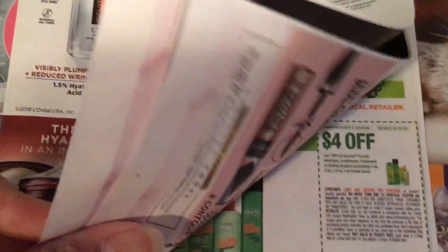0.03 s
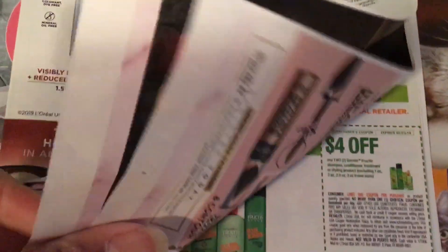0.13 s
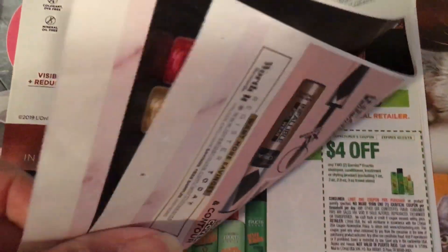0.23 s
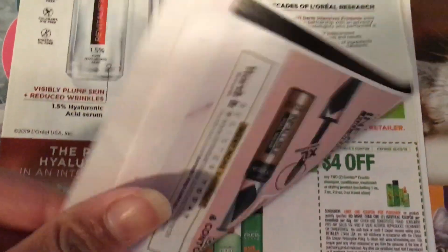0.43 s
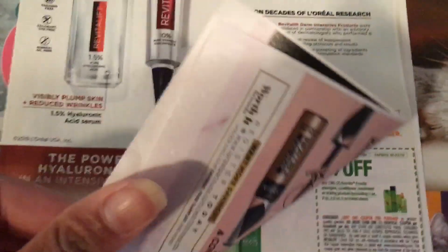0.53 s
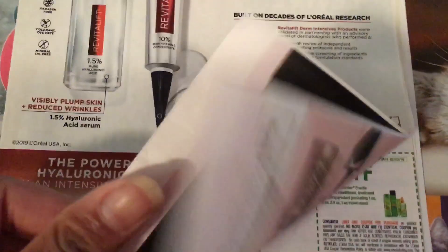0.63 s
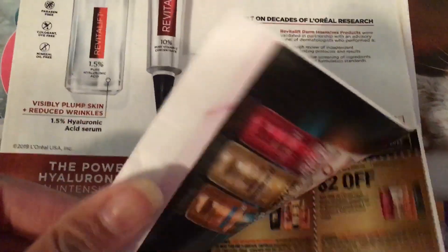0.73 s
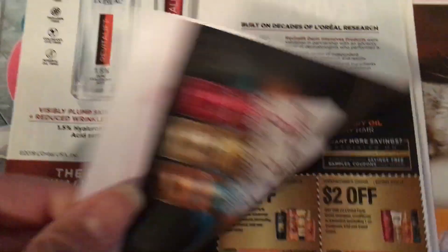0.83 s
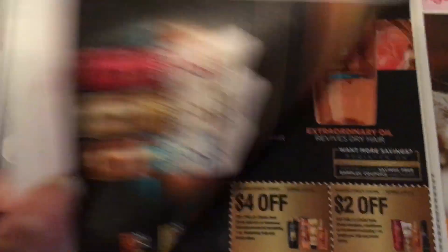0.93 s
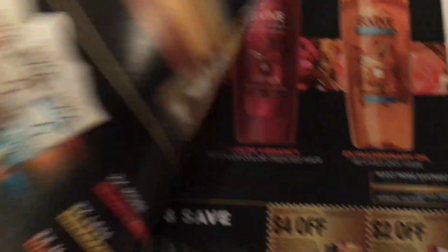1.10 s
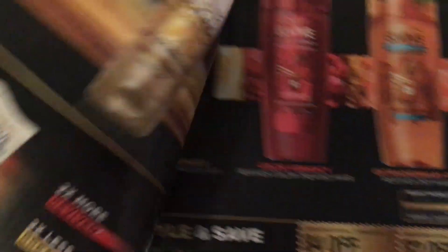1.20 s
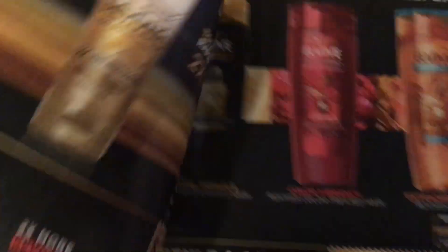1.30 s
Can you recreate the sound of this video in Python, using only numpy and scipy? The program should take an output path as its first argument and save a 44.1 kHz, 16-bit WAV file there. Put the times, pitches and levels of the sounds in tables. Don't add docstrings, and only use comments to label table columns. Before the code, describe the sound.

Glossy paper pages crinkle, slide and snap as they are turned close up in a quiet room.

```python
import sys
import numpy as np
from scipy import signal
from scipy.fft import rfft, irfft
from scipy.io import wavfile
from scipy.ndimage import uniform_filter1d

SR = 44100
rng = np.random.default_rng(int(sys.argv[2]) if len(sys.argv) > 2 else 0)


def unload_wav(signal):
    wavfile.write(
        sys.argv[1],
        SR,
        np.round(np.clip(np.atleast_2d(signal).T, -1, 1) * 32767).astype(np.int16),
    )


def voltage_ratio(level):
    return 10 ** (np.asarray(level, float) / 20)


N = 59535

# pitch_hz [Hz], level_db [dB per Hz]
ROOM_COLOUR = [(15, -41), (25, 9), (399, -3.5), (634, -9), (1120, -7.5), (1360, -20), (1510, -10.5),
               (12900, -21.5), (16500, -36)]
# pitch_hz [Hz], level_db [dB per Hz]
SLIDE_COLOUR = [(88, -37), (150, -13), (539, -6.5), (1560, 6), (4510, 0.5), (4870, -2), (9150, -1.5),
                (15300, -5), (16500, -51)]
# start_s [s], level_db [dB], tilt_db [dB per octave], pocket_hz [Hz]
LIFT_STROKES = [
    [(0.0, -42, 1.2, 6640), (0.034, -48, 0.8, 6700), (0.08, -53.5, -0.8, 5660), (0.138, -43.5, -0.3, 6720),
     (0.176, -55.5, 0, 5990), (0.214, -38, -0.5, 6160)],
    [(0.245, -45, 0, 4870), (0.272, -44, -4, 4500), (0.284, -40, -1.2, 4600), (0.357, -46, -1.2, 4920),
     (0.387, -49, -0.2, 6300), (0.426, -38.5, 1.8, 6750)],
    [(0.455, -39.5, -0.9, 8600), (0.513, -46.5, 1.2, 8800), (0.545, -46, 0.6, 8850),
     (0.552, -45, 0.7, 4500), (0.575, -43, 1.3, 4590), (0.587, -39, -0.8, 4510), (0.604, -52.5, -3, 4350)],
    [(0.618, -54.5, -5, 5330), (0.64, -56.5, -1.5, 6200), (0.68, -44, -1, 6400)],
    [(0.715, -39.5, -1.5, 6200), (0.768, -56.5, -2.8, 5250)],
]
# start_s [s], level_db [dB], tilt_db [dB per octave], pocket_hz [Hz]
SWEEP_STROKES = [
    [(0.782, -69, -10, 7590), (0.808, -75, -2, 7600), (0.818, -40, 1, 7600), (0.826, -38, 3, 7360),
     (0.858, -40, 1, 7500)],
    [(0.872, -41, 1.5, 7360), (0.93, -42.5, 1, 8200), (0.966, -45.5, 2, 7060)],
    [(1.0, -45.5, -0.3, 5400), (1.058, -47.5, 1, 5660), (1.104, -59.5, -0.5, 6100), (1.136, -58, 1.5, 7700),
     (1.148, -58, -0.5, 7700), (1.17, -60, 2.5, 7480)],
    [(1.18, -59, -4, 6440), (1.184, -65, 1.5, 6400), (1.248, -62, 0.01, 5770), (1.254, -57, -8, 5760),
     (1.272, -66, -7, 5760)],
    [(1.29, -55.5, -8, 5500), (1.294, -63, -5, 5530), (1.326, -57, 0, 5730), (1.33, -53.5, 0, 5560),
     (1.35, -57.5, 2.5, 5730)],
]
# pitch_ratio [1], depth_db [dB]
POCKET_DIPS = [(.64, -2.5), (1.5, -1.5)]
# start_s [s], level_db [dB], travel_ms [ms at 1 kHz], lowest_hz [Hz]
AIR_FLAPS = [(.003, -50, 3.8, 141), (.220, -35.5, 2.26, 128), (0.223, -59, 4.5, 59),
             (0.278, -38.5, 1.47, 174), (0.371, -52, 2.9, 122), (0.431, -47, 3.45, 120),
             (0.582, -53.5, 2.18, 150), (0.694, -45.5, 1.77, 110), (0.894, -54, 2.87, 140),
             (0.971, -35, 3.18, 175), (.975, -42, 5.26, 62.4), (1.237, -50.5, 2.4, 139),
             (1.279, -48, 1.37, 302)]
# start_s [s], level_db [dB peak], pitch_hz [Hz], length_ms [ms]
DULL_TICKS = [(0.048, -38, 1410, 1.04), (0.281, -25.5, 1700, 1.7), (.4425, -32, 2400, 2.2),
              (.583, -35.5, 1780, 2.03), (0.609, -31, 2560, 0.94), (0.669, -39, 1900, 1.1),
              (.4598, -31, 2300, 1.6), (.6895, -21, 3970, 1.18), (0.743, -37.5, 2190, 2.2),
              (.772, -37.5, 1580, 1.13), (.831, -28, 8000, 2.4), (0.8627, -24, 2600, 1.52),
              (.900, -37.5, 910, 1.93), (.951, -37, 1410, 0.65), (0.971, -26, 1970, 1.2),
              (1.049, -41.5, 1170, 2.15), (1.174, -42.5, 1010, 1.1), (1.277, -37.5, 606, 2.55),
              (1.278, -36.5, 2450, 2.6)]
# start_s [s], level_db [dB peak], lowest_hz [Hz], length_ms [ms], travel_ms [ms at 1 kHz]
CREASE_SNAPS = [
    (0.2203, -9, 250, 1.15, 3),
    (0.4314, -17.5, 550, 1.3, 2.93),
    (0.6865, -17, 990, 1.094, 3.15),
    (0.695, -16.5, 590, 1.9, 3.0),
    (0.9723, -10, 250, 1.04, 2.9),
]
# pitch_hz [Hz], level_db [dB per Hz]
SNAP_COLOUR = [(240, -15), (400, -8.5), (3120, -2), (7700, -6), (11200, -10), (15000, -10), (16500, -27)]
PANEL_BUCKLES = [.220, .281, .431, .686, .695, .772, .863, .972, 1.278]
# delay_ms [ms], level_db [dB peak], pitch_hz [Hz], swell_ms [ms]
PANEL_RINGS = [
    [(.7, -16.5, 6800, 0.53), (0.897, -14.5, 4250, 0.45), (.55, -20, 11100, 0.51),
     (1.798, -19.5, 2810, 0.52), (1.77, -21.5, 1524, 1.22), (4.5, -30, 1990, 1.07), (2.27, -36, 630, 1.13)],
    [(.4, -31.5, 1700, 0.97), (0.19, -35.5, 3500, 0.52)],
    [(.55, -20.5, 5830, 0.44), (.4, -26.5, 9200, 0.41), (3.8, -22.5, 3050, 0.54), (1.61, -25.5, 1640, 1.4),
     (2.2, -30.5, 860, 1.35), (16.5, -35, 1400, 0.35), (2.67, -32.5, 1280, 1.2), (6.8, -30, 2250, 0.96)],
    [(.8, -21.5, 9760, 0.58), (1.2, -20.5, 6170, 0.61), (2.12, -30.5, 2900, 0.88), (1.164, -29, 4850, 0.64),
     (0.88, -35, 13100, 0.54)],
    [(0.29, -22, 2650, .9), (1.29, -19.5, 3270, 0.63), (1.04, -24, 12000, 0.73), (2.6, -26, 5170, 0.82),
     (0.53, -28, 1960, 1.16), (5.6, -23.5, 2470, 0.34), (1.57, -35, 906, 1.06)],
    [(.3, -45, 780, 1.1), (.6, -43, 2570, 0.91)],
    [(0.23, -27.5, 3270, 0.48), (0.72, -26.5, 1920, 0.63), (0.39, -36, 5530, 0.58)],
    [(1.1, -15, 12000, 0.41), (0.97, -14.5, 6780, 0.39), (0.74, -20, 1410, 1.44), (2.2, -17.5, 2440, 0.57),
     (3.3, -23, 3630, 0.56), (3.16, -33, 758, 1.5)],
    [(.4, -42, 1990, 0.71), (.6, -50, 4630, 0.75)],
]


def unit(x):
    return x / np.sqrt(np.mean(x ** 2))


def colour(points, hz):
    p = np.array(points, float)
    return np.interp(np.log(hz + 1), np.log(p[:, 0]), p[:, 1])


def shaped(x, gain):
    return irfft(rfft(x) * gain(np.fft.rfftfreq(len(x), 1 / SR)), len(x))


def bell(hz, centre_hz, octaves):
    return np.exp(-.5 * (np.log2((hz + 1) / centre_hz) / octaves) ** 2)


def walk(rate_hz):
    hold = int(SR / rate_hz)
    levels = np.repeat(rng.standard_normal(N // hold + 1), hold)
    slewed = uniform_filter1d(uniform_filter1d(levels, hold), hold)
    return unit(slewed[:N])


def add(out, x, start_s):
    i = int(start_s * SR)
    out[i:i + len(x)] += x[:len(out) - i]


def bending(length_ms, travel_ms, level_db, gain, chance, size=4096):
    loss_db_per_cycle, fade = .55, .55
    hz = np.fft.rfftfreq(size, 1 / SR)
    when, far, big = chance[:, :, None]
    late = -np.log(1 - .99 * when)
    wait_cycles = hz * late * length_ms / 1000
    travel_cycles = 2 * (.3 + 1.5 * far) * travel_ms / 1000 * np.sqrt(1000 * hz)
    strength = (2 * big - 1) * np.exp(-fade * late) * voltage_ratio(-loss_db_per_cycle * wait_cycles)
    waves = np.sum(strength * np.exp(-2j * np.pi * (wait_cycles + travel_cycles)), axis=0)
    even = np.sqrt(uniform_filter1d(np.abs(waves) ** 2, size=50))
    fade_out = np.clip(3 - 4 * np.arange(size) / size, 0, 1)
    wave = irfft(gain(hz) * waves / even, size) * fade_out
    return wave * voltage_ratio(level_db) / np.abs(wave).max()


def room_tone():
    hum_hz, hum_width_hz = 59, 11
    air = unit(shaped(rng.standard_normal(N), lambda hz: voltage_ratio(colour(ROOM_COLOUR, hz))))
    hum = unit(shaped(rng.standard_normal(N), lambda hz: 1 / (1 + (2 * (hz - hum_hz) / hum_width_hz) ** 2)))
    return air * voltage_ratio(-57.5) + hum * voltage_ratio(-63.5)


def slide():
    grains_per_s, grain_db = 14000, 2.2
    pocket_db, pocket_oct, dip_oct = 5, 0.28, 0.078
    flicker_db, judder_db = 1.8, 1.1
    rows = np.concatenate([np.array(s, float) for s in LIFT_STROKES + SWEEP_STROKES])
    t = np.arange(N) / SR
    level, tilt, pocket = (np.interp(t, rows[:, 0], rows[:, k]) for k in (1, 2, 3))
    out = 0
    for f in 250 * 2 ** np.arange(0, 6.2, .25):
        slips = (rng.random(N) < grains_per_s / SR) * rng.standard_normal(N)
        grains = slips * voltage_ratio(grain_db * rng.exponential(size=N))
        band = shaped(unit(grains), lambda hz: bell(hz, f, .13) * voltage_ratio(colour(SLIDE_COLOUR, hz)))
        dips = sum(db * bell(f, ratio * pocket, dip_oct) for ratio, db in POCKET_DIPS)
        resonance = pocket_db * bell(f, pocket, pocket_oct)
        brightness = tilt * np.log2(f / 3500)
        out = out + band * voltage_ratio(dips + brightness + resonance + flicker_db * walk(20.63))
    return unit(out) * voltage_ratio(level + judder_db * walk(88.9))


def flaps():
    top_hz, q = 516, 1.46
    out = np.zeros(N)
    one_break = np.array([[0], [.5], [1]])
    for s, db, travel, f in AIR_FLAPS:
        def low(hz):
            return hz ** 1.63 / (f ** 2 - hz ** 2 + 1j * hz * f / q) / (1 + (hz / top_hz) ** 2)
        add(out, bending(0, travel, db, low, one_break, size=8192), s)
    return out


def ticks():
    out = np.zeros(N)
    width_oct, travel_ms = 0.75, 0.96
    for s, db, f, ms in DULL_TICKS:
        add(out, bending(ms, travel_ms, db, lambda hz: bell(hz, f, width_oct) + 0.02, rng.random((3, 30))), s)
    return out


def snaps():
    out = np.zeros(N)
    for s, db, f, ms, travel in CREASE_SNAPS:
        def crack(hz):
            return voltage_ratio(colour(SNAP_COLOUR, hz)) / (1 + (f / (hz + 1)) ** 2)
        add(out, bending(ms, travel, db, crack, rng.random((3, 40))), s)
    return out


def rings():
    out, t = np.zeros(N), np.arange(1000) / SR
    sag = .05
    for s, panels in zip(PANEL_BUCKLES, PANEL_RINGS):
        for delay_ms, db, f, swell_ms in panels:
            u = np.minimum(t * 1000 / swell_ms, 20)
            swell = u * np.exp(1 - u)
            tone = np.sin(2 * np.pi * f * t * (1 + sag * (1 - u / 2)))
            add(out, voltage_ratio(db) * swell * tone, s + delay_ms / 1000)
    return out


def reverberation(pops):
    t60_s, wet_db, ceiling_s, ceiling_db = 0.11, -12, .0146, -20.5
    t = np.arange(SR // 3) / SR
    tail = rng.standard_normal(len(t)) * voltage_ratio(-60 * t / t60_s) * np.minimum(t / 0.002, 1)
    energy = np.sum(tail ** 2)
    tail = voltage_ratio(wet_db) * shaped(tail, lambda hz: 1 / np.sqrt(1 + (hz / 7000) ** 2)) / np.sqrt(energy)
    echo = rng.standard_normal(60) * np.exp(-np.arange(60.))
    add(tail, voltage_ratio(ceiling_db) * echo, ceiling_s)
    return signal.fftconvolve(pops, tail)[:N]


def scene():
    pops = rings() + snaps() + ticks() + flaps()
    return (pops + reverberation(pops) + slide() + room_tone())[None]


def top_cut(x):
    return signal.sosfilt(signal.butter(12, 16960, fs=SR, output="sos"), x)


def record(dry):
    low_hz, top_hz = 50.3, 16200
    x = signal.sosfilt(signal.butter(3, low_hz, "high", fs=SR, output="sos"), dry)
    x = signal.sosfilt(signal.ellip(8, .2, 60, top_hz, fs=SR, output="sos"), x)
    return top_cut(x)


dry = scene()
out = record(dry)
unload_wav(out)
```